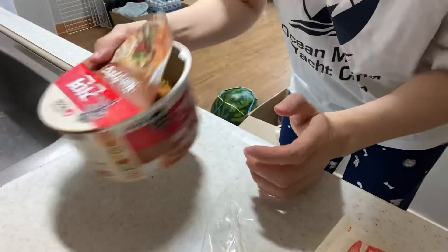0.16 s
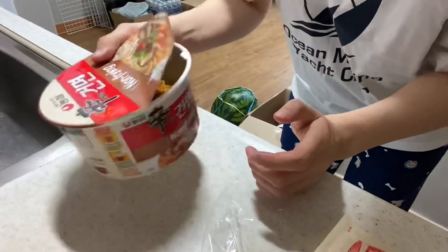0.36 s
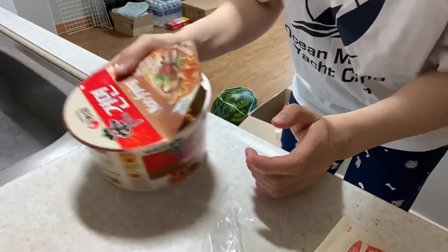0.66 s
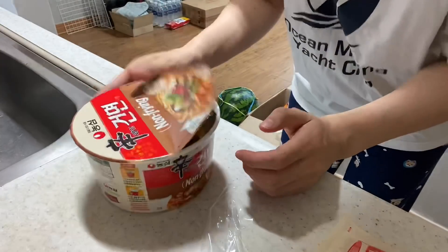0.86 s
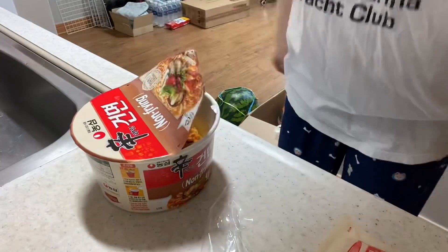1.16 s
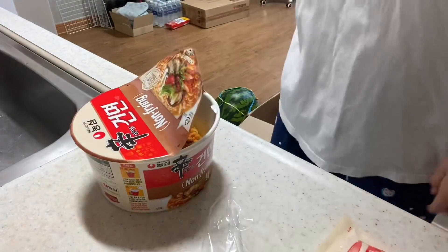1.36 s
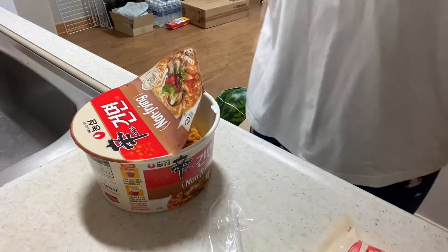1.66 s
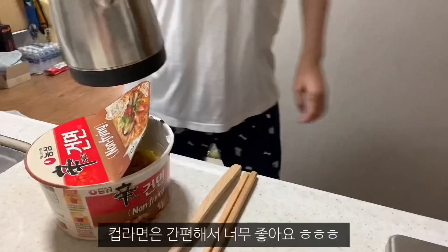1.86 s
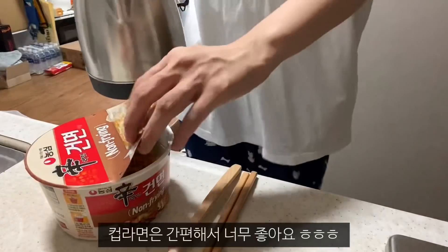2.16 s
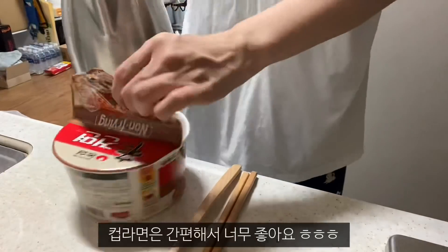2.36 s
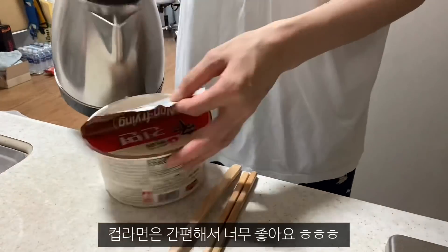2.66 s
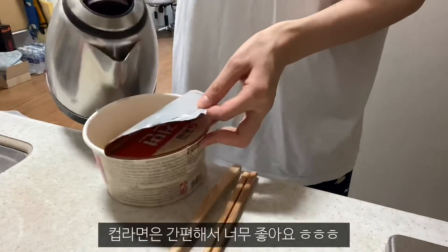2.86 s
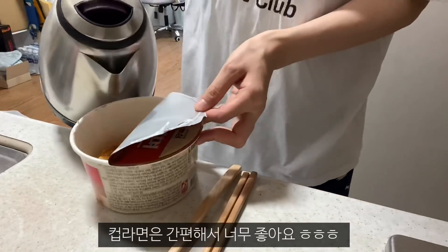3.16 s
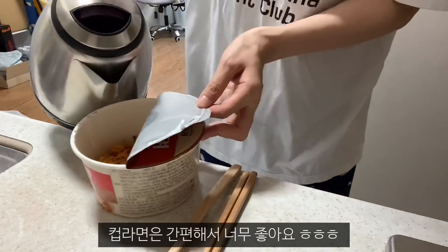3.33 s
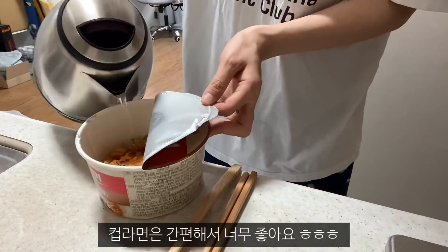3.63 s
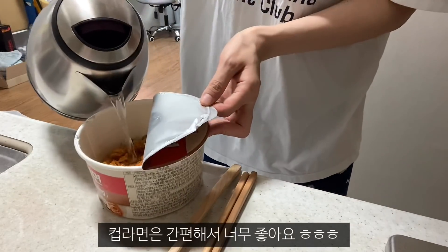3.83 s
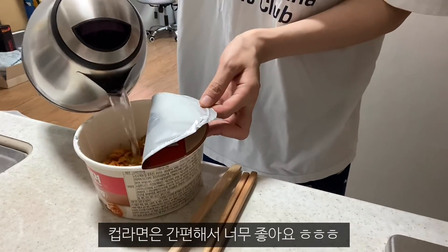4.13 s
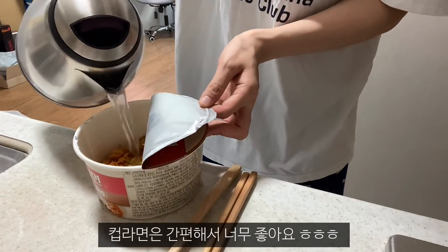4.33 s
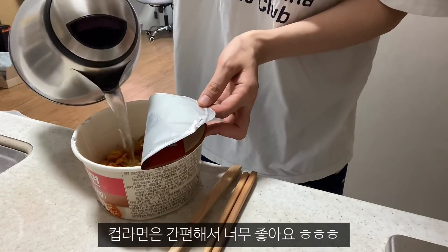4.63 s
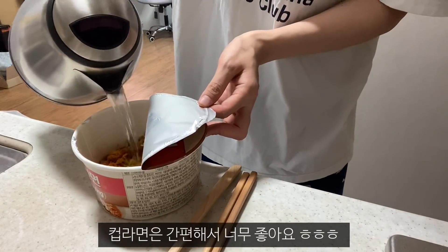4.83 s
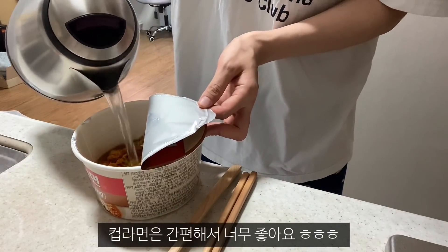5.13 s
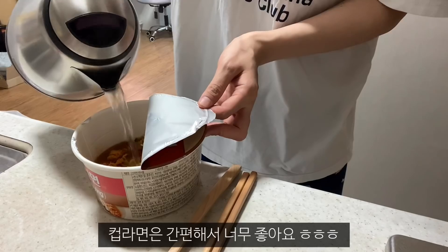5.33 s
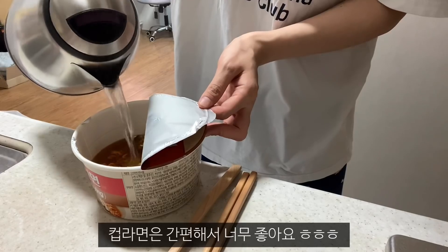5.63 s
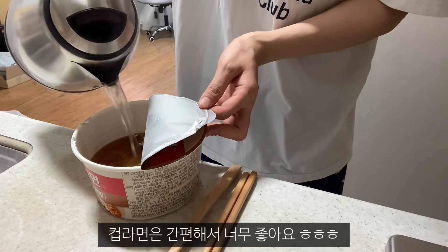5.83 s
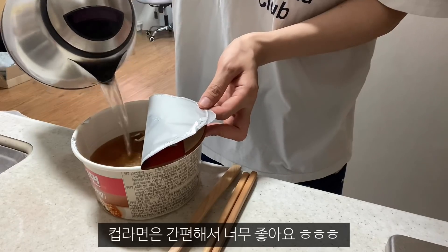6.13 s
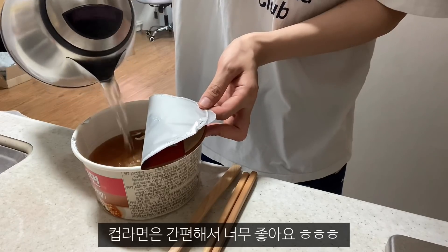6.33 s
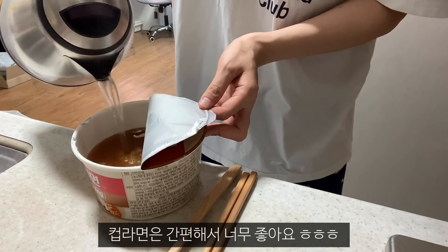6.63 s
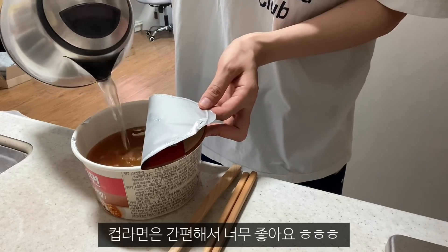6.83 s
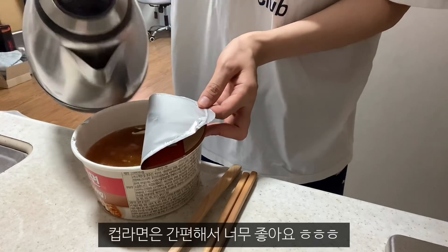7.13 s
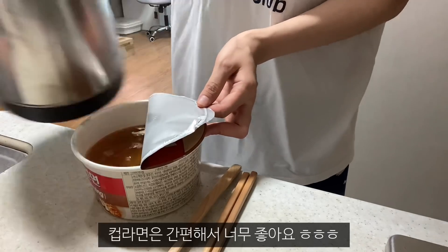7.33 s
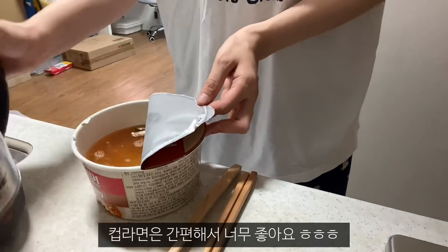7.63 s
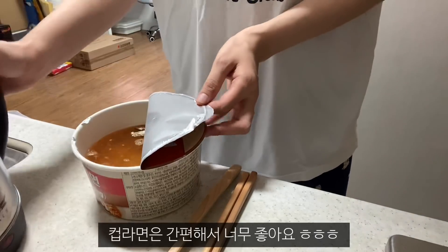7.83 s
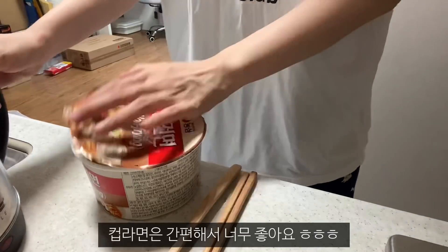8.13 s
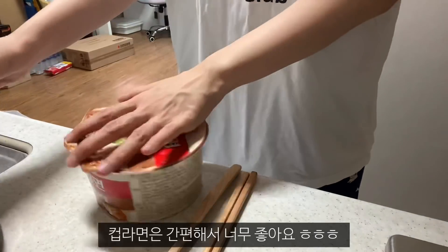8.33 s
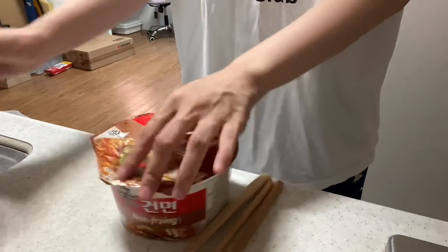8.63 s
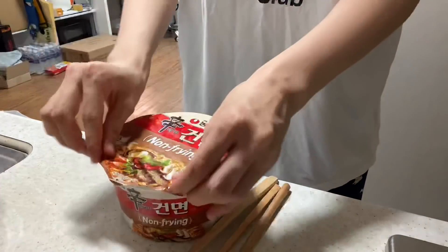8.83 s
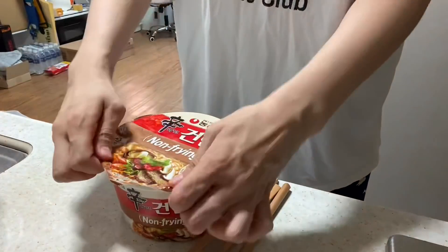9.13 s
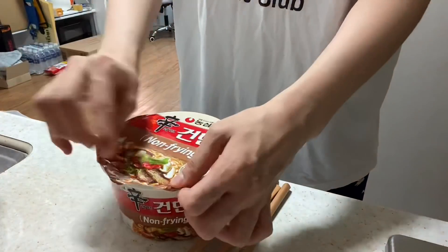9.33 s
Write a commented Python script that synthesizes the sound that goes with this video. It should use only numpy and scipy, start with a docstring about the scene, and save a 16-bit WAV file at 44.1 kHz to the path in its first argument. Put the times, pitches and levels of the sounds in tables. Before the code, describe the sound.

Close-miked in a small kitchen with a short room response; a quiet motor hum, thin wavering whine near two kilohertz and low room rush run throughout. From 0 to 0.55 s a dry noodle block rattles about a dozen times in a hollow paper cup, with crumb hiss. Sharp clacks at 0.65-0.8 s set it down. A kettle's seethe continues until it cuts off abruptly near 1.9 s. From 2.1 to 3.3 s fingers rub and peel a foil lid, with papery knocks and dull bumps around 2.55 s. Water begins softly at 3.5 s, a thin patter on noodles, becoming wetter and splashier after 5.4 s, with plops strongest around 6.4 s, a brief gurgle at 6.7 s and a last splash at 7.1 s. At 7.68 s the kettle lands with a loud boom and clank, rocking until 7.9 s. Lid rubbing, cup flexing and light taps follow to 9.45 s.

```python
"""Making cup noodles.

A paper cup of dry noodles is shaken and set on a kitchen counter; an electric kettle's seethe ends abruptly.
The foil lid is peeled back, hot water trickles over the noodles, and the kettle is put down with a thump.
A hand smooths the lid shut and taps the rim. An appliance hums and whines in the small room.
Knocks are ringing modes plus noise; lid and water are filtered noise, tiny impulses and bubble tones."""
import sys
import numpy as np
from scipy import signal
from scipy.fft import rfft, irfft, next_fast_len
from scipy.io import wavfile
from scipy.ndimage import map_coordinates

SR = 44100
rng = np.random.default_rng(int(sys.argv[2]) if len(sys.argv) > 2 else 0)


def materialize(psi):
    """Save the field psi as 16-bit PCM at rate SR to the path in sys.argv[1].

    A 1-D psi becomes a single channel; in a 2-D psi each row is a channel.
    """
    bounded = np.clip(np.atleast_2d(psi).T, -1, 1)
    quanta = np.round(bounded * 32767).astype(np.int16)
    wavfile.write(sys.argv[1], SR, quanta)


N = 418509

# Ways the paper cup rings, also used by taps(): pitch_hz, level_db (relative), t60_s (time to fade by 60 dB)
CUP_MODES = [(104, -9, 0.056), (137, -1.5, 0.061), (205, -12.5, 0.083), (252, 2, 0.07), (438, -3.5, 0.091),
             (488.5, 2.5, 0.094), (533, 0, 0.071), (736, 3, 0.046), (954, 3, 0.066), (1036, 5.5, 0.042),
             (1317, 4.5, 0.032), (1440, 8.5, 0.037), (1506, 13, 0.042), (1700, 3.5, 0.048),
             (1778, 13.5, 0.038), (1867, 5.5, 0.043), (2124, 6.5, 0.039), (2455, 5, 0.038),
             (3008, 5, 0.045), (3385, 3.5, 0.039), (4244, 7, 0.019), (6700, -12.5, 0.049)]
# Thud, body, clack and crack bands of a knock on the cup, also used by taps(): low_hz, high_hz
CUP_BANDS = [(65, 310), (380, 1200), (1250, 4500), (4500, 14000)]
# Balance of one shake over those bands: thud_db, body_db, clack_db, crack_db
SHAKE_COLOUR_DB = [-15, -9.5, 2, 6]
# The noodle block hits the cup wall and the wall answers (levels relative):
# start_s, level_db, pitch_hz, wall_level_db, wall_pitch_hz
SHAKES = [(0.029, -24.5, 1757, -19.5, 500), (0.079, -24.5, 1870, -28, 490), (0.122, -22, 1754, -27, 500),
          (0.179, -27.5, 1530, -33, 960), (0.22, -27, 1810, -22, 245), (0.268, -24.5, 1710, -24.5, 950),
          (0.313, -25, 1480, -27, 263), (0.362, -24, 1480, -29.5, 509), (0.407, -25, 1480, -23.5, 485),
          (0.452, -21, 1484, -22.5, 495), (0.497, -25.5, 1460, -31.5, 990), (0.538, -33, 1720, -44, 497)]
# Dullness is the loss per octave above the pitch
SHAKE_DULL_DB, WALL_DULL_DB = 6.5, 9
WALL_LAG_S = 0.007
CRUMB_DB, CRUMB_STOP_S, CRUMB_T60_S = -34.5, 0.44, 0.61
# Tone of the dry crumbs: frequency_hz, level_db (relative)
CRUMB_SPECTRUM = [(88, -40), (150, -4), (264, 0.5), (328, -3.5), (494, -12), (979, -9.5), (1190, -10.5),
                  (1550, 1.5), (2400, -7), (3200, -2.5), (4200, -10.5), (10000, -8.5), (16000, -13)]


def shaking():
    """The noodle block hits the cup; the wall bulges and rings hollow just after, and loose crumbs hiss."""
    rows = [(s, db, hz, SHAKE_DULL_DB) for s, db, hz, _, _ in SHAKES]
    rows += [(s + WALL_LAG_S, db, hz, WALL_DULL_DB) for s, _, _, db, hz in SHAKES]
    knocks = blows(rows, CUP_MODES, CUP_BANDS, SHAKE_COLOUR_DB, detune=0.013, spot_db=18.5, spot_t60=0.17,
                   crack_db=8.5, crack_t60=0.041, rattle_db=-1.5, rattle_t60=0.056, rise=0.005)
    grains = coloured(crackle(9000, spread_db=3, smooth=0.5), CRUMB_SPECTRUM)
    crumbs = wavering(grains, depth=0.03, rate=22)
    # the hiss lasts through most of the shaking, then settles
    settling = envelope(0, CRUMB_STOP_S, 1 / SR, CRUMB_T60_S)
    return amp(-7) * knocks + amp(CRUMB_DB) * settling * crumbs


# Balance of one tap over the cup's bands: thud_db, body_db, clack_db, crack_db
TAP_COLOUR_DB = [-14.5, -4, 3.5, 5]
# Cup, rim and lid are knocked or snap:
# start_s, level_db (relative), pitch_hz, dullness_db (loss per octave above the pitch)
TAPS = [(0.6505, -21.5, 1765, 9), (0.654, -24.5, 630, 4), (0.662, -30, 1840, 9), (0.7472, -21.5, 1495, 9.5),
        (0.748, -24.5, 2540, 25), (0.753, -27, 626, 10), (0.787, -29, 500, 23), (0.7875, -23, 980, 16.5),
        (0.796, -29, 1155, 19), (0.802, -26.5, 493, 20), (2.105, -44, 537, 5.5), (2.108, -41, 1240, 20),
        (2.126, -38.5, 1160, 24), (2.136, -55, 1230, -1), (2.335, -33.5, 760, 20), (2.381, -35.5, 1380, 7),
        (2.382, -31, 525, 5.5), (2.442, -33, 613, 15), (2.526, -36, 840, 25), (2.541, -29, 1410, 7.5),
        (2.549, -16.5, 245, 23), (2.572, -20, 242, 26), (2.633, -29.5, 785, 9.5), (2.635, -34, 1000, 20),
        (2.653, -36, 900, 20), (2.7055, -29, 1340, 16), (2.707, -24.5, 573, 10.5), (2.792, -35, 485, 9.5),
        (8.067, -40, 1330, 27), (8.146, -42, 1350, 7.5), (8.38, -30.5, 1550, 6), (8.384, -37.5, 930, 11),
        (8.449, -41, 434, 4.5), (8.723, -31, 1390, 7.5), (8.747, -22.5, 447, 12), (8.796, -46.5, 1545, 6),
        (9.07, -54, 1660, 17), (9.115, -52.5, 1820, 8.5), (9.18, -54.5, 1700, 7), (9.238, -40, 1580, 9.5),
        (9.266, -42.5, 1500, 8), (9.321, -21, 180, 17), (9.34, -36.5, 348, 7.5), (9.361, -29, 228, 8.5),
        (9.393, -23.5, 446, 20), (9.3935, -34, 1620, 32), (9.4505, -22, 1810, 29), (9.452, -32, 470, 14)]
# Short crisp bursts: cup contacts, jumping dry crumbs and later the foil lid:
# start_s, length_s, level_db, pitch_hz
CRISP_BURSTS = [(0.6515, 0.0017, -40.5, 6450), (0.675, 0.13, -54.5, 9000), (0.7485, .002, -39, 6470),
                (1.305, 0.023, -59.5, 11050), (0.757, 0.02, -43, 4530), (2.381, 0.0036, -36.5, 4260),
                (7.868, 0.018, -54, 5350), (7.938, 0.0092, -61, 10000), (7.9595, 0.003, -40.5, 4560),
                (8.037, 0.0027, -66, 5000), (8.143, 0.008, -56.5, 5770), (8.448, 0.0023, -35.5, 12100),
                (8.722, 0.0039, -33.5, 4400), (8.741, 0.0033, -43.5, 12000), (8.935, 0.0021, -56.5, 7750)]


def taps():
    """Sharp, dry contacts ring the paper cup; short crisp clouds of grains sound around them."""
    knocks = blows(TAPS, CUP_MODES, CUP_BANDS, TAP_COLOUR_DB, detune=0.025, spot_db=13.5, spot_t60=0.17,
                   crack_db=18, crack_t60=0.014, rattle_db=4.5, rattle_t60=0.07, rise=0.0008)
    crisp = bursts(CRISP_BURSTS, grain_rate=1200, octaves=1.4, attack=0.0017, t60=0.029)
    return amp(-8.5) * knocks + crisp


# Ways the counter booms: pitch_hz, level_db (relative), t60_s
COUNTER_MODES = [(85, -21, 0.37), (108.5, -7, 0.16), (129.7, 0.5, 0.12), (186.6, 3, 0.11), (234, -1, 0.11),
                 (284.4, -4.5, 0.17), (460, -4, 0.11)]
# The kettle's weight bumps the counter, later lands on it and rocks: start_s, level_db (relative), contact_s
THUMPS = [(3.161, -40, .003), (3.182, -48, 0.0034), (7.6832, -17.5, 0.0024), (7.715, -22.5, 0.0023),
          (7.7756, -24.5, 0.0033), (7.822, -21.5, .005), (7.867, -40, 0.005)]
# Ways the kettle's base rings: pitch_hz, level_db (relative), t60_s
KETTLE_BASE_MODES = [(457, 1.5, 0.096), (540, -2, 0.086), (745, -2.5, 0.079), (990, 2, 0.037),
                     (1124, 5.5, 0.04), (1330, 6.5, 0.022), (1640, -5.5, 0.05), (1736, -0.5, .05),
                     (2135, -2.5, .045), (2505, 7, 0.026), (3460, -12, 0.018)]
# Thud, body, clack and crack bands of a clank: low_hz, high_hz
CLANK_BANDS = [(40, 340), (380, 1300), (1300, 3800), (4000, 16000)]
# Balance of one clank over those bands: thud_db, body_db, clack_db, crack_db
CLANK_COLOUR_DB = [-5, -1, 1.5, 4.5]
# The base clanks as it lands, scrapes and rocks:
# start_s, level_db (relative), pitch_hz, dullness_db (loss per octave above the pitch)
CLANKS = [(7.6805, -18.5, 1030, 10.5), (7.684, -26, 455, 25), (7.696, -33.5, 1720, 19),
          (7.706, -27.5, 462, 21), (7.726, -32.5, 1120, 29), (7.766, -57, 2300, 13), (7.774, -32, 447, 29),
          (7.8125, -35.5, 1710, 13), (7.815, -31, 562, 9), (7.886, -57, 1100, 5)]


def kettle_down():
    """The heavy kettle booms the counter and its base clanks; longer contacts leave only deeper modes."""
    boom, t = np.zeros((2, N)), np.arange(SR // 2) / SR
    ring = sum(amp(db - 60 * t / t60) * np.sin(2 * np.pi * hz * t) for hz, db, t60 in COUNTER_MODES)
    for s, db, contact_s in THUMPS:
        push = np.sin(np.pi * np.minimum(t / contact_s, 1))
        thump = signal.fftconvolve(ring, push / push.sum())
        add(boom, s, amp(db) * thump[None] * amp([[0], [-4]]))  # the side is 4 dB below the mid
    clanks = blows(CLANKS, KETTLE_BASE_MODES, CLANK_BANDS, CLANK_COLOUR_DB, detune=0.01, spot_db=7,
                   spot_t60=0.13, crack_db=17, crack_t60=0.013, rattle_db=4, rattle_t60=0.1, rise=0.0008)
    return boom + amp([[-7.5], [-11]]) * clanks


# Strength of the stream as the kettle is tipped and raised: time_s, level_db (relative)
FLOW = [(3.5, -16), (3.8, -4.5), (4.2, 1), (4.7, 0), (5.1, 0), (5.55, -5), (5.95, -5), (6.55, -2),
        (6.75, -2.5), (7.0, -1), (7.25, -14)]
# Tone of drops slapping: frequency_hz, level_db (relative)
SPLAT_SPECTRUM = [(600, -63), (950, 23), (1150, -12), (1380, 5), (1800, 2), (2230, -6), (2380, -21),
                  (3000, -3), (3700, -6), (4600, -35), (7000, -31)]
# Tone of the fine spray: frequency_hz, level_db (relative)
SPRAY_SPECTRUM = [(2350, -19.5), (3700, 7), (4600, -7), (5470, 2.5), (6110, -4), (6980, 4), (8500, -12),
                  (11600, -17), (12600, 5.5), (13800, -11), (16000, 1)]
# Water sizzles on the hot spout: start_s, length_s, level_db, pitch_hz
SIZZLES = [(3.78, 0.066, -82, 4500), (3.99, 0.033, -76, 4700), (4.2, .05, -77, 7900),
           (6.91, .04, -73, 7900), (7.17, 0.074, -75, 7460), (7.4, 0.036, -77, 7960)]
PATTER_DB, SPRAY_DB = -74.5, -75.5  # the stream on bare noodles
OPEN_PATTER_DB, OPEN_SPRAY_DB = 6, 8  # gain once the stream hits open water
TRICKLE_DB = -78.5  # single bubbles that ring clear of the patter
# The hollow above the water rings; later it shrinks and its pitch climbs
HOLLOW_DB, HOLLOW_HZ = -85, 6660
HOLLOW_RISE_S, HOLLOW_HZ_PER_S = 4.8, 280
HOLLOW_DB_PER_S = 2.5  # louder as the cup fills
HOLLOW_SLOSH_HZ = 50  # the moving surface unsettles it
FROTH_DB, FROTH_HZ = -90, 12200  # the finest bubbles burst on open water
BUBBLING_DB = -78  # deep bubbles all through the pour
# The stream plunges deep once
GURGLE_S, GURGLE_LENGTH_S, GURGLE_DB, GURGLE_T60_S = 6.68, 0.13, -53.5, 0.24


def pouring():
    """A thin stream patters on the noodles, sprays and traps bubbles; patter and spray grow on open water."""
    t = np.arange(N) / SR
    open_water = covered(t)
    flow = amp(curves(FLOW)[0])
    surge = amp(2.4 * wobble(30) + 1.2 * wobble(7))
    drops = crackle(650, spread_db=4, smooth=0.4)
    fizz = bubbles(3200, pitch_hz=1430, scatter=0.21, cycles=8, spread_db=3.5)
    splats = unit(0.7 * coloured(drops, SPLAT_SPECTRUM) + fizz)
    patter = amp(PATTER_DB + OPEN_PATTER_DB * open_water) * splats
    trickle = amp(TRICKLE_DB) * bubbles(1000, pitch_hz=1330, scatter=0.22, cycles=12, spread_db=2.5)
    spray = amp(SPRAY_DB + OPEN_SPRAY_DB * open_water) * coloured(drops, SPRAY_SPECTRUM)
    climb_hz = HOLLOW_HZ_PER_S * np.maximum(t - HOLLOW_RISE_S, 0)
    hollow_hz = HOLLOW_HZ + climb_hz + HOLLOW_SLOSH_HZ * wobble(12)
    hollow_db = HOLLOW_DB + HOLLOW_DB_PER_S * (t - HOLLOW_RISE_S) + 3.3 * wobble(16)
    hollow = amp(hollow_db) * gliding(drops, hollow_hz, width_hz=250)
    froth = amp(FROTH_DB) * open_water * gliding(drops, np.full(N, FROTH_HZ), width_hz=360)
    stream = flow * surge * (patter + trickle + spray + hollow + froth)
    deep_bubbles = bubbles(2500, pitch_hz=430, scatter=0.24, cycles=5, spread_db=2.5)
    gurgle = amp(GURGLE_DB) * envelope(GURGLE_S, GURGLE_LENGTH_S, GURGLE_LENGTH_S / 2, GURGLE_T60_S)
    sizzle = bursts(SIZZLES, grain_rate=3300, octaves=0.34, attack=0.02, t60=0.11)
    return stream + (amp(BUBBLING_DB) * flow + gurgle) * deep_bubbles + sizzle


COVER_S, COVER_TAKES_S = 5.33, 0.35


def covered(s):
    """How far the water has covered the noodles at time s, 0-1."""
    return np.clip((s - COVER_S) / COVER_TAKES_S, 0, 1)


# The loudest splashes in the cup: start_s, slap_db, spray_db
SPLASHES = [(3.911, -81, -90), (4.177, -73, -86), (4.211, -69, -73), (4.307, -77, -85), (4.347, -78, -73),
            (4.671, -77, -83), (4.692, -72, -88), (4.8424, -77, -76), (4.908, -69.5, -80),
            (5.345, -82, -76), (5.468, -78, -71.5), (5.528, -74, -71.5), (5.768, -67, -71),
            (5.836, -67, -68.5), (5.858, -70, -81), (5.893, -69, -79), (5.926, -64.5, -76),
            (5.936, -64, -78), (5.956, -69, -70), (5.995, -68, -74), (6.017, -66, -69), (6.0226, -68, -77),
            (6.066, -66, -81), (6.104, -65, -85), (6.142, -66, -83), (6.225, -70, -85), (6.28, -72, -78),
            (6.313, -65, -74), (6.35, -63, -84), (6.3589, -59, -77), (6.373, -60, -74), (6.404, -63, -71),
            (6.442, -70, -84), (6.4832, -60, -71), (6.49, -57, -68), (6.502, -69, -83), (6.533, -69, -73),
            (6.593, -62, -72), (6.618, -70, -70), (6.64, -69, -74), (6.661, -62.5, -71), (6.778, -74, -86),
            (6.85, -64, -80), (6.876, -67, -77), (6.998, -82, -77), (7.086, -64, -62.5),
            (7.0984, -57.5, -63)]
# The bubbles under a splash: pitch, relative level, cycles to fade, spread of their starts
PLIP_HZ, PLIP_DB, PLIP_CYCLES, PLIP_SPREAD_S = 1553, -23, 6.4, 0.011


def splashes(t60):
    """Larger drops break off the stream, slap the surface, trap three small bubbles and spatter."""
    out, t = np.zeros((2, N)), np.arange(SR // 10) / SR
    for s, slap_db, spray_db in SPLASHES:
        spatters = 0.3 + (rng.random(len(t)) < 1200 / SR)
        burst = noise(len(t)) * spatters * amp(-60 * t / t60)
        age = np.maximum(t - rng.uniform(0, PLIP_SPREAD_S, (3, 1)), 0)
        plip_hz = PLIP_HZ * np.exp(0.22 * rng.standard_normal((3, 1)))
        turns = plip_hz * age * (1 + 4 * age)  # the pitch rises with age
        rings = np.sin(2 * np.pi * turns) * np.exp(-turns / PLIP_CYCLES)
        plips = amp(PLIP_DB) * noise(size=3) @ rings
        slap = band(burst + plips, (1050, 2300), slap_db, order=6)
        add(out, s, slap + band(burst, (3100, 15500), spray_db))
    return out


# Fingers slide on the lid, peeling it back and later smoothing it shut (levels relative):
# start_s, length_s, rub_db, foil_hiss_db (counted from rub_db)
SLIDES = [(2.081, 0.019, -48, -8), (2.174, .2, -41, -8.5), (2.387, 0.036, -47, -20),
          (2.501, 0.031, -38, -15), (2.6, 0.22, -51.5, -13), (2.916, 0.14, -56.5, -7),
          (3.174, 0.06, -48, -14), (3.288, 0.082, -62, -7.5), (7.828, 0.15, -54, -11.5),
          (8.11, 0.26, -55, -12), (8.268, 0.077, -47, -8.5), (8.426, 0.1, -43.5, -10.5),
          (8.54, 0.27, -57.5, -11), (9.018, 0.065, -49, -22.5), (9.174, 0.41, -56, -12)]
# The hand presses on the cup and flexes it: start_s, length_s, level_db (relative)
PRESSES = [(2.483, 0.097, -52), (3.177, 0.043, -44), (7.94, 0.21, -48.5), (8.13, 0.25, -43.5),
           (8.461, 0.1, -42.5), (8.679, 0.081, -42.5), (9.043, 0.039, -44), (9.204, 0.2, -45.5)]
# Tone of the hissing foil: frequency_hz, level_db (relative)
FOIL_SPECTRUM = [(1760, -13.5), (3000, -7), (4540, -5.5), (5070, -8.5), (8760, -10), (10300, -16.5),
                 (15100, -17), (16000, -22)]
# Tone of the rubbing fingers: frequency_hz, level_db (relative)
RUB_SPECTRUM = [(350, -44), (600, 11), (753, 4.5), (1270, -2), (1430, 6), (2690, -13.5), (3210, -24),
                (3830, -23), (4500, -13), (5850, -57), (9900, -120)]
# Tone of the flexing cup: frequency_hz, level_db (relative)
FLEX_SPECTRUM = [(29, -73), (50, -25), (102, 3), (229, -2), (372, -14), (452, 0.5), (634, -36), (690, -15),
                 (900, -51), (1170, -28), (1980, -120)]
STROKE_ATTACK_S, STROKE_T60_S = 0.05, 0.42
RUB_GAIN_DB, FLEX_GAIN_DB = -7, -3


def lid():
    """Fingers slide on the foil in tiny slips and flex the cup; the lid's resonances shift as it bends."""
    def stroke(s, length):
        return envelope(s, length, STROKE_ATTACK_S, STROKE_T60_S)

    rub, hiss = sum(amp([[db], [db + hiss_db]]) * stroke(s, length) for s, length, db, hiss_db in SLIDES)
    flex = sum(amp(db) * stroke(s, length) for s, length, db in PRESSES)
    slips = crackle(4000, spread_db=3.5, smooth=0.6) * amp(1.2 * wobble(70))
    foil = hiss * coloured(slips, FOIL_SPECTRUM)
    grains = coloured(crackle(2500, spread_db=3.5, smooth=0.6), RUB_SPECTRUM)
    rubbing = rub * wavering(grains, depth=0.07, rate=14)
    grip = amp(2 * wobble(60))
    flexing = flex * grip * coloured(noise(), FLEX_SPECTRUM)
    return foil + amp(RUB_GAIN_DB) * rubbing + amp(FLEX_GAIN_DB) * flexing


# The kettle body's resonances: pitch_hz, width_hz, level_db (relative)
KETTLE_BODY = [(120, 8.3, -43), (256.5, 16.7, 4), (451, 25, -2), (544.5, 30, 5), (637, 8.1, -0.5),
               (734, 21, 3.5), (1380, 28, -4.5), (1646, 32, -8.5), (2780, 150, -16.5), (3400, 180, -20.5),
               (5200, 380, -24)]
# Tone of the steam: frequency_hz, level_db (relative)
STEAM_SPECTRUM = [(410, -29), (700, 0), (934, -26.5), (1360, -11.5), (2270, -20), (2590, -16.5),
                  (4730, -21), (6230, -26.5), (14800, -40), (16000, -32)]
# Strength of the seething, with its abrupt end: time_s, level_db (relative)
SEETHE = [(0, -45.5), (.9, -44.5), (1.5, -45.5), (1.853, -46), (1.89, -98), (2, -120)]


def seething():
    """Steam bubbles collapse on the heater and ring the kettle; churning water unsettles its resonances."""
    def body(f):
        total = 0
        for k, (centre, width, db) in enumerate(KETTLE_BODY):
            damping = 1j * f * width
            total = total + (-1) ** k * amp(db) * damping / (centre * centre - f * f + damping)
        return total

    pops = crackle(5000, spread_db=7, smooth=0.61)
    ringing = wavering(unit(filtered(pops, body)), depth=0.022, rate=16) * amp(wobble(11))
    steam = amp(-7.5) * coloured(noise(), STEAM_SPECTRUM)
    return amp(curves(SEETHE)[0]) * (ringing + steam)


# A motor's steady tones: pitch_hz, level_db (relative)
HUM = [(111, -69), (136.5, -63), (227, -67), (337.5, -71), (409.8, -67), (674.7, -69.5), (787, -80.5),
       (6756, -89.5)]
# Pitch of the drive's whine: time_s, pitch_hz
WHINE = [(0, 1975), (3.1, 1965), (3.7, 1972), (4.7, 1976), (5.6, 1955), (5.9, 1922), (7, 1917), (7.6, 1908),
         (9.49, 1902)]
# The whine comes and goes: time_s, level_db (relative)
WHINE_LEVEL = [(0, -4), (2.1, -3), (3.1, 0), (3.7, 0.5), (4.8, 0.5), (5.4, -3), (6, 2.5), (7.4, 1.5),
               (9.49, 5)]
# Tone of the room's rush: frequency_hz, level_db (relative)
AIR_SPECTRUM = [(20, -19), (55, 9.5), (80, -2), (115, 7.5), (170, -4.5), (240, 7), (320, -6.5), (460, 7),
                (580, -2), (820, -17.5), (1400, -21.5), (2000, -17.5), (2500, -34.5), (3800, -24.5),
                (5000, -29.5), (16000, -37)]


def appliance():
    """A motor's steady hum and the wavering whine of its drive, over the room's low rush."""
    t = np.arange(N) / SR
    run = t + 0.0001 * wobble(4.3)  # the motor runs slightly ahead or behind
    hum = sum(amp(db) * np.sin(2 * np.pi * hz * run + rng.uniform(0, 2 * np.pi, (2, 1))) for hz, db in HUM)
    whine_hz = curves(WHINE, None)[0] + 3 * wobble(9.6)
    turn = 2 * np.pi * np.cumsum(whine_hz + 9 * wobble(150)) / SR + rng.uniform(0, 2 * np.pi, (2, 1))
    tone = amp(-72) * np.sin(turn) + amp(-83.5) * np.sin(2 * turn)
    # a narrow flutter of noise surrounds the whine and, nearly, its octave
    flutter = amp(-77.5) * gliding(noise(), whine_hz, width_hz=60)
    flutter += amp(-78.5) * gliding(noise(), 1.995 * whine_hz, width_hz=66)
    swell = amp(curves(WHINE_LEVEL, None)[0] + 1.1 * wobble(12))
    rush = amp(-57) * coloured(noise(), AIR_SPECTRUM)
    return amp(1.5) * hum + swell * (tone + flutter) + rush


# How long the room rings: frequency_hz, t60_s
ROOM = [(100, 0.47), (500, 0.23), (2000, 0.2), (12000, 0.24)]


def kitchen(x):
    """The small room's short answer: noise that fades at its own speed at each frequency."""
    hz, t, z = signal.stft(noise(SR // 2), SR, nperseg=256)
    fade = amp(-60 * t / along(ROOM, hz)[:, None])
    tail = signal.istft(z * fade, SR, nperseg=256)[1]
    tail = np.pad(tail, ((0, 0), (SR // 150, 0)))  # the answer comes a moment later
    return signal.fftconvolve(x, tail / np.linalg.norm(tail[0]), axes=1)[:, :N]


SPOT_DAMPING_HZ = 330  # a struck spot of this pitch rings half as long as a very deep one
CHATTER_DB, CHATTER_PER_S = 5, 350  # depth and rate of the unevenness in a blow's rattle


def blows(rows, modes, bands, colour_db, detune, spot_db, spot_t60,
          crack_db, crack_t60, rattle_db, rattle_t60, rise):
    """Each contact cracks, rings slightly retuned modes and its spot's own pitch, and rattles unevenly."""
    out, t = np.zeros((2, N)), np.arange(SR // 4) / SR
    crack = amp(crack_db - 60 * t / crack_t60)
    rattle = amp(rattle_db - 60 * t / rattle_t60)
    centres = np.sqrt(np.prod(bands, axis=1))
    for s, level_db, pitch_hz, dull_db in rows:
        spot = (pitch_hz, spot_db, spot_t60 / (1 + pitch_hz / SPOT_DAMPING_HZ))
        hz, level, t60 = np.transpose([*modes, spot])[..., None]
        hz[:-1] *= 1 + detune * rng.standard_normal((len(modes), 1))
        rings = amp(level - 60 * t / t60) * np.sin(2 * np.pi * hz * t)
        strengths = amp(rng.normal(0, 3, len(hz))) * rng.choice([-1, 1], len(hz))
        # mid and side ring a quarter cycle apart
        ring = signal.hilbert(strengths @ rings, 2 * len(t))[:len(t)]
        knots = rng.standard_normal(len(t) // 20)
        chatter = amp(CHATTER_DB * map_coordinates(knots, [t * CHATTER_PER_S], order=1))
        hit = np.array([ring.real, ring.imag]) + (crack + rattle * chatter) * noise(len(t))
        hit *= 1 - np.exp(-t / rise)
        # a soft contact is duller above its pitch
        octaves_above = np.maximum(np.log2(centres / pitch_hz), 0)
        levels = level_db + np.array(colour_db) - dull_db * octaves_above
        add(out, s, sum(band(hit, edges, db) for edges, db in zip(bands, levels)))
    return out


def bursts(rows, grain_rate, octaves, attack, t60):
    """Short clouds of grains, each in a band around its own pitch."""
    out, t = np.zeros((2, N)), np.arange(SR // 4) / SR
    for s, length, db, hz in rows:
        grains = noise(len(t)) * (0.3 + (rng.random(len(t)) < grain_rate / SR))
        edges = np.minimum(hz * 2 ** (octaves * np.array([-0.5, 0.5])), SR / 2 - 1)
        sos = signal.butter(2, edges, 'bandpass', fs=SR, output='sos')
        cloud = unit(signal.sosfilt(sos, grains))
        fade = amp(db - 60 * np.maximum(t - length, 0) / t60)
        add(out, s, cloud * np.minimum(t / attack, 1) * fade)
    return out


def bubbles(count, pitch_hz, scatter, cycles, spread_db):
    """Damped sines at random times; each rises in pitch as its bubble nears the surface."""
    t = np.arange(SR // 40) / SR
    start = rng.integers(0, N, (count, 1))
    pitch, size, side = rng.standard_normal((count, 3)).T[..., None]
    turns = pitch_hz * np.exp(scatter * pitch) * t
    loudness = amp(spread_db * np.clip(size, -2, 2))
    ring = np.sin(2 * np.pi * turns * (1 + 3 * t)) * np.exp(-turns / cycles) * loudness
    where = (start + np.arange(len(t))).ravel()
    return unit(np.array([np.bincount(where, (ring * g).ravel(), N)[:N] for g in (1, side)]))


def crackle(rate, spread_db, smooth):
    """Tiny impulses of uneven size at random times, over a share of smooth noise."""
    sizes = amp(spread_db * np.clip(rng.standard_normal(N), -2, 2))
    sizes = sizes * (rng.random(N) < rate / SR)
    return unit(unit(sizes * noise()) + smooth * noise())


def noise(size=N):
    """Unrelated mid and side noise."""
    return rng.standard_normal((2, size))


def wavering(x, depth, rate):
    """x with all its resonances wandering up and down, by a share set by depth."""
    at = np.arange(N) + depth * SR / rate * wobble(rate)
    return np.array([map_coordinates(c, [at], order=2) for c in x])


def gliding(x, hz, width_hz):
    """x through a narrow resonance whose centre moves, at rms 1."""
    carrier = np.exp(2j * np.pi * np.cumsum(hz) / SR)
    sos = signal.butter(2, width_hz / 2, fs=SR, output='sos')
    return unit(np.real(signal.sosfilt(sos, x / carrier) * carrier))


def coloured(x, spectrum):
    """x through a causal filter with the given spectrum, at rms 1."""
    m = 2 * next_fast_len(N // 2 + 8192)
    cepstrum = irfft(np.log(amp(along(spectrum, np.fft.rfftfreq(m, 1 / SR)))))
    # folding the cepstrum forward makes the filter causal
    cepstrum[1:m // 2] *= 2
    cepstrum[m // 2 + 1:] = 0
    return unit(irfft(rfft(x, m) * np.exp(rfft(cepstrum)))[..., :N])


def filtered(x, response):
    """x times a response of frequency."""
    m = next_fast_len(N + SR // 2)
    return irfft(rfft(x, m) * response(np.fft.rfftfreq(m, 1 / SR)), m)[..., :N]


def band(x, edges, db, order=4):
    """One band of a short sound, with the given level over its first 30 ms."""
    y = signal.sosfilt(signal.butter(order, edges, 'bandpass', fs=SR, output='sos'), x)
    return amp(db) * y / np.sqrt(np.mean(y[:, :SR * 3 // 100] ** 2, axis=1, keepdims=True))


def envelope(start, length, attack, t60):
    """Rise from the start; once the length is over, die away."""
    t = np.arange(N) / SR - start
    return np.clip(t / attack, 0, 1) * amp(-60 * np.maximum(t - length, 0) / t60)


def wobble(rate):
    """A smooth random curve, rate knots a second."""
    return map_coordinates(rng.standard_normal(int(N * rate / SR) + 4), [np.arange(N) * rate / SR])


def curves(rows, outside=-120):
    """One value per sample for each column after the time."""
    s, *cols = np.transpose(rows)
    return [np.interp(np.arange(N) / SR, s, c, outside, outside) for c in cols]


def along(points, hz):
    """Read (Hz, value) points on a log frequency axis."""
    f, v = np.transpose(points)
    return np.interp(np.log(hz + 1), np.log(f + 1), v)


def add(track, s, sound):
    """Mix a sound in at time s."""
    start = max(round(s * SR), 0)
    track[:, start:start + sound.shape[1]] += sound[:, :N - start]


def unit(x):
    """Each channel at rms 1."""
    return x / np.sqrt(np.mean(x ** 2, axis=-1, keepdims=True) + 1e-20)


def amp(db):
    """Decibels to a plain multiplier."""
    return 10 ** (np.asarray(db) / 20)


# Stereo width: frequency_hz, side_gain_db
WIDTH = [(60, -26), (150, -9.5), (350, -11.5), (700, -3), (1400, 2), (3000, 0), (6000, -1.5), (9500, -1.5),
         (13000, -11.5)]


def scene():
    """All sources as mid and side, turned into left and right; the bass is nearly mono."""
    near = shaking() + taps() + kettle_down() + splashes(t60=0.053)
    room = amp(-11.5) * kitchen(near)
    mid, side = near + room + pouring() + lid() + seething() + appliance()
    side = filtered(side, lambda hz: amp(along(WIDTH, hz)))
    return np.array([mid + side, mid - side]) * amp([[0.4], [-0.4]])  # left slightly louder


LOW_HZ, TOP_HZ = 74.6, 15950


def record(dry):
    """The microphone cuts the deep bass and keeps nothing above its band limit."""
    thin = signal.sosfilt(signal.butter(7, LOW_HZ, 'highpass', fs=SR, output='sos'), dry)
    return filtered(thin, lambda hz: hz < TOP_HZ)


dry = scene()
out = record(dry)
materialize(out)
```